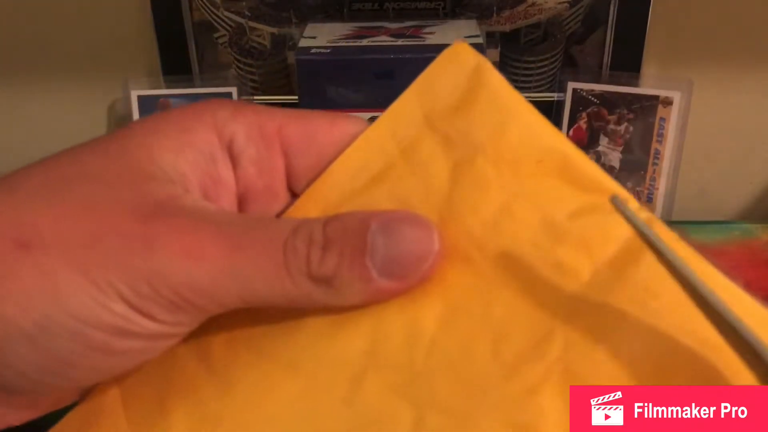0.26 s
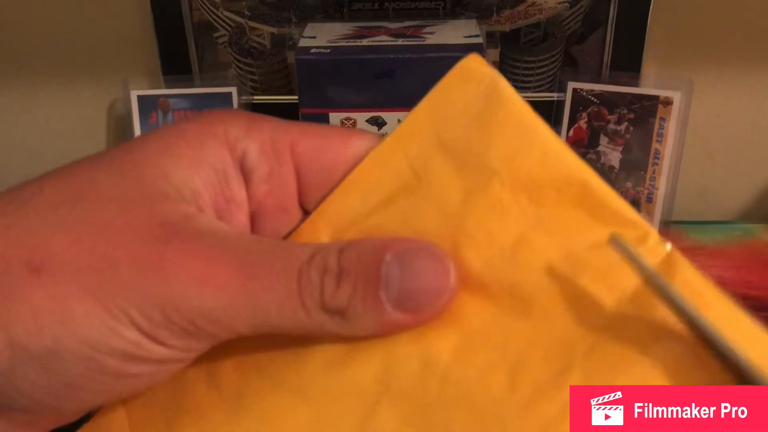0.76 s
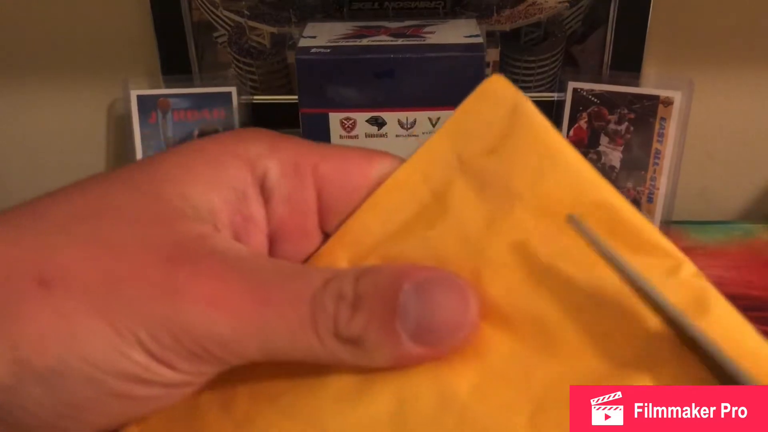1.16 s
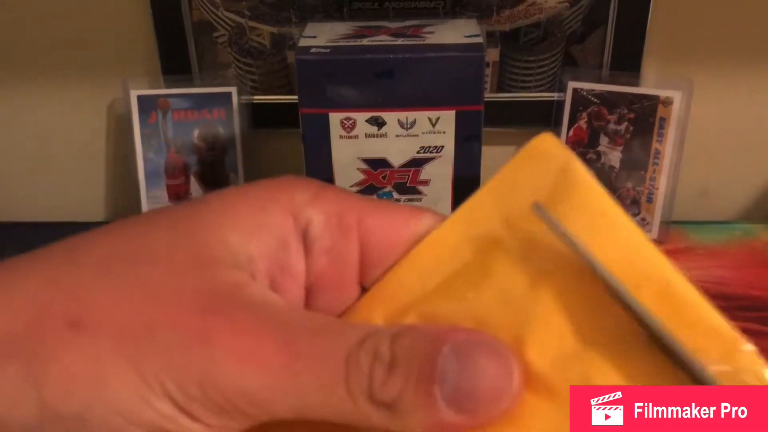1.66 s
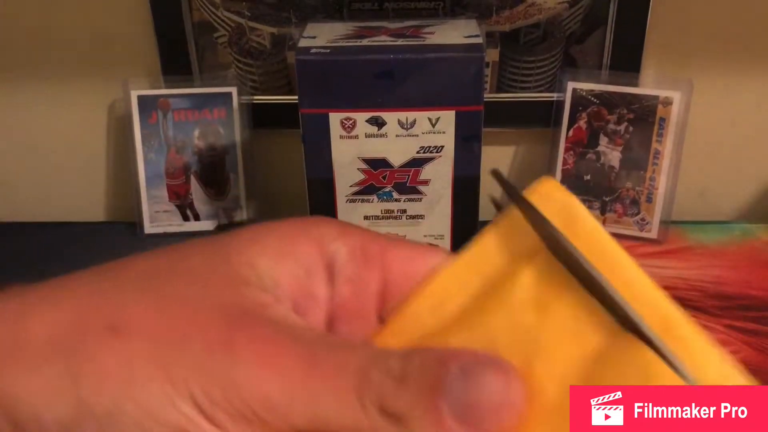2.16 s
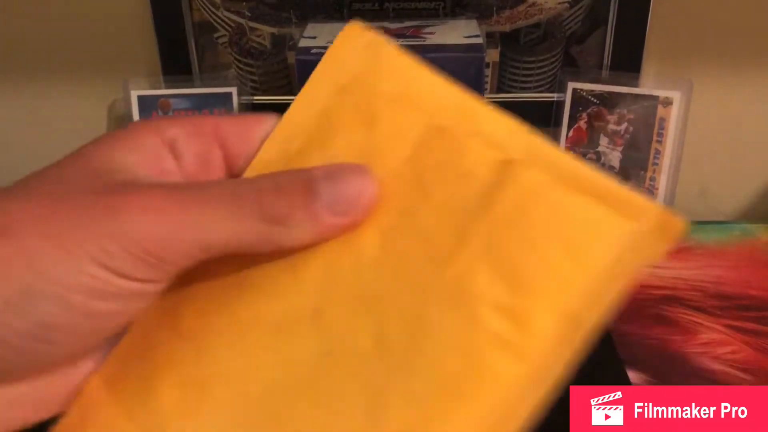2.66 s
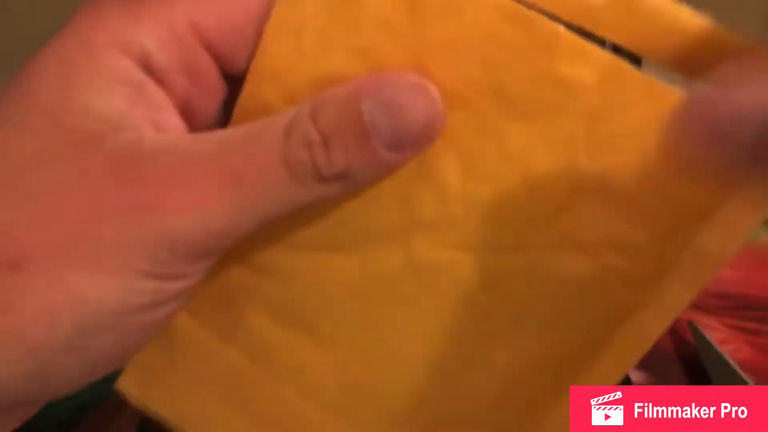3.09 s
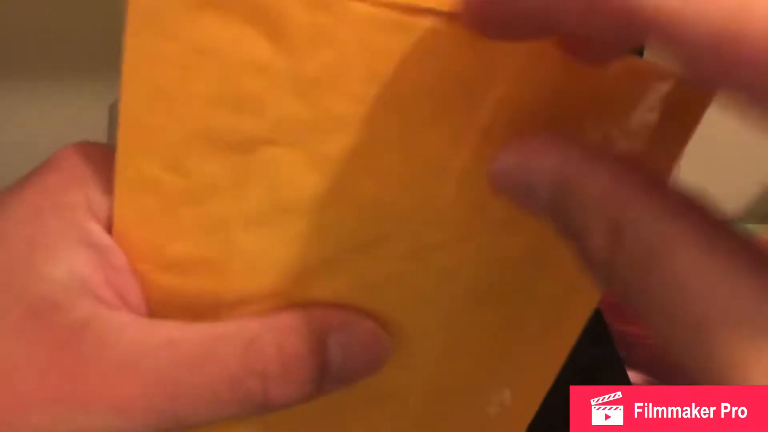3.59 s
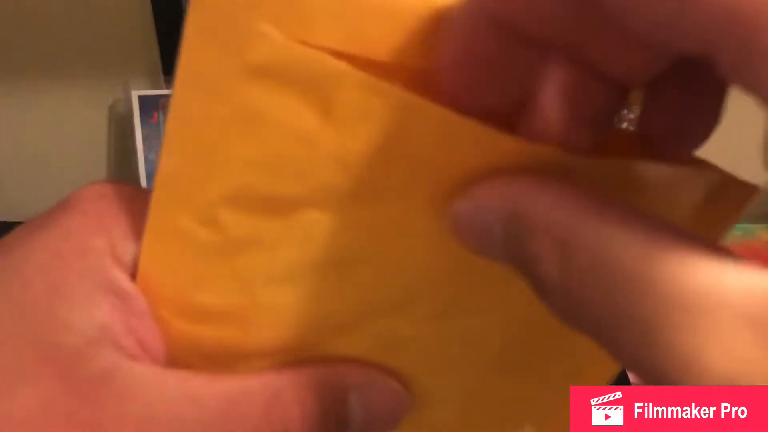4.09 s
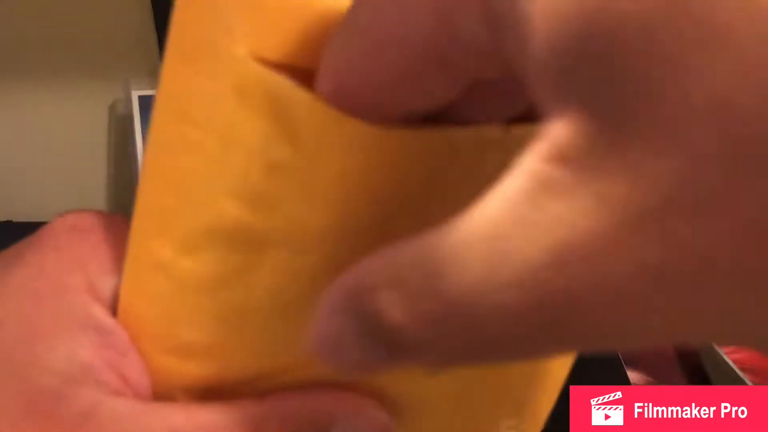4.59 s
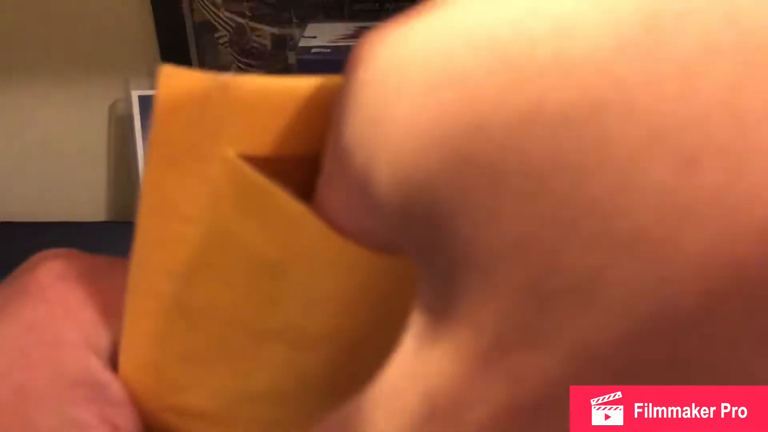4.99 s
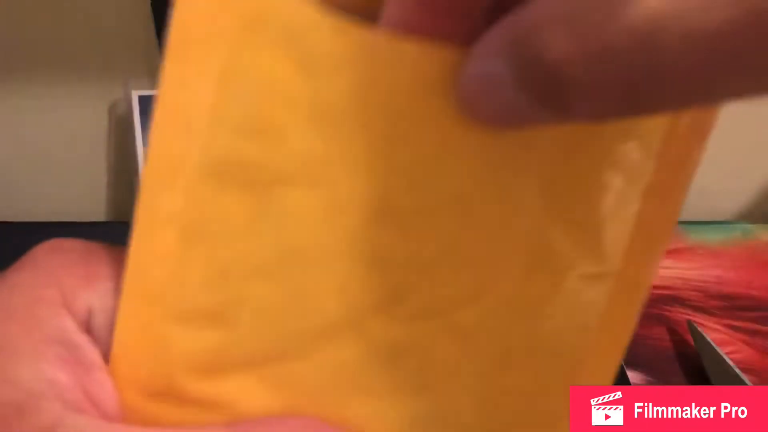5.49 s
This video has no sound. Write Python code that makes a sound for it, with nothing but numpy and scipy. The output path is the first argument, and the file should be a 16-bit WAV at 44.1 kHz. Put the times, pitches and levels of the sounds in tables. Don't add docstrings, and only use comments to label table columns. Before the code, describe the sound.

A padded paper mailer is opened very close to a small microphone in a small, slightly reverberant room with faint low mains hum and air noise. From 0 s scissors push quietly through the paper in short rasping strokes; by 0.5 s the scratching grows, with a sharp crack near 0.9 s. Cutting gets denser and brighter, with hard snaps at 1.3 and 1.8 s, the latter the loudest, and a low crunch just after. Strokes fade around 2.4 s, leaving tiny paper ticks. At about 2.75-3.0 s the scissors drop on a wooden table, a dull low thump with quick bounces and light handle knocks. From 3.1 s the envelope is turned and handled in short crinkles. Prying snaps cluster at 4.0-4.4 s, then a hand slides inside with continuous dry rustling, soft padded pats and strong crunches near 4.8 s. Rustling thins after 5.3 s, with a last snap near 5.7 s.

```python
import sys
import numpy as np
from scipy import signal
from scipy.fft import rfft, irfft, next_fast_len
from scipy.io import wavfile
from scipy.ndimage import uniform_filter1d, map_coordinates

SR = 44100
rng = np.random.default_rng(int(sys.argv[2]) if len(sys.argv) > 2 else 0)


def makeup_ratio(level_db):
    decades = np.asarray(level_db, float) / 20
    return 10 ** decades


def inscribe(sig):
    pcm = np.round(np.clip(np.atleast_2d(sig).T, -1, 1) * 32767)
    wavfile.write(sys.argv[1], SR, pcm.astype(np.int16))


N = 253530


def unit(x):
    return x / np.sqrt(np.mean(x ** 2) + 1e-20)


def along(points, hz):
    f, v = np.transpose(points)
    return np.interp(np.log(hz + 1), np.log(f + 1), v)


def wobble(rate):
    knots = rng.standard_normal(int(N * rate / SR) + 4)
    return map_coordinates(knots, [np.arange(N) * rate / SR])


def filtered(x, response):
    m = next_fast_len(N + SR // 2)
    return irfft(rfft(x, m) * response(np.fft.rfftfreq(m, 1 / SR)), m)[..., :N]


def ring(modes, t, spread_db):
    total = np.zeros(len(t))
    for hz, db, t60 in modes:
        strike_db = db + spread_db * rng.standard_normal()
        total += makeup_ratio(strike_db - 60 * t / t60) * np.sin(2 * np.pi * hz * t)
    return total


def place(out, s, sound):
    out[round(s * SR):][:len(sound)] += sound


def strokes(rows):
    t, level, dull = np.arange(0, N, 16) / SR, -120., 0.
    stick_db, attack_db_per_s, release_db_per_s = 10, 2500, 361
    for s, length, in_db, out_db, dull_db in rows:
        end = s + length
        swell = np.interp(t, [s, end, end + 0.0055], [in_db, out_db, out_db - stick_db])
        swell = swell - attack_db_per_s * (s - t).clip(0)
        swell = swell - release_db_per_s * (t - end).clip(0)
        dull = np.where(swell > level, dull_db, dull)
        level = np.maximum(level, swell)
    return [np.interp(np.arange(N) / SR, t, c) for c in (level, dull)]


def fibres(share, spread_db):
    hit = rng.random(N) < share
    size_db = spread_db * rng.exponential(size=N).clip(0, 3)
    return unit(hit * rng.standard_normal(N) * makeup_ratio(size_db))


def crinkles():
    pops_per_s, middle_hz, cycles = 260, 2225, 12.2
    draw, t = rng.random((int(pops_per_s * N / SR), 3)), np.arange(200) / SR
    hz = middle_hz * np.exp(2.22 * (draw[:, 1:2] - .5))
    size_db = -4.5 * np.log(1 - draw[:, 2:]).clip(-3.5, 0)
    pops = makeup_ratio(size_db - 60 * t * hz / cycles / 2) * np.sin(2 * np.pi * hz * t)
    at = (draw[:, :1] * N).astype(int) + np.arange(len(t))
    return unit(np.bincount(at.ravel(), pops.ravel(), N + len(t))[:N])


def bent(x, fold_hz, lift_db, patchy_db, held_db):
    hz, t, z = signal.stft(x, SR, nperseg=256)
    hz = hz[:, None]
    centre = fold_hz[np.minimum((t * SR).astype(int), N - 1)]
    lift = lift_db * np.exp(-(np.log((hz + 1) / centre) / 0.37) ** 2)
    field = uniform_filter1d(rng.standard_normal(z.shape), size=4, axis=0)
    field = uniform_filter1d(field, size=5, axis=1)
    held = uniform_filter1d(rng.standard_normal(z.shape), size=2, axis=0)
    held = uniform_filter1d(held, size=18, axis=1)
    patches = patchy_db * unit(field) + held_db * unit(held)
    patches = patches / (1 + (hz / 6500) ** 2)
    return signal.istft(z * makeup_ratio(lift + patches), SR, nperseg=256)[1][:N]


# (start [s], length [s], level as it sets in [dB], level as it ends [dB], dullness [dB])
CUTS = [(0.0, 0.073, -69, -66, 0), (.1, .07, -58, -67, 0), (.18, 0.06, -59, -56.5, 0),
        (.262, 0.05, -52, -48, 2), (.32, .016, -53, -50, -2), (.337, 0.026, -60, -52, 0),
        (.365, .04, -62, -63, 4), (.41, 0.055, -58, -54, 2), (.465, 0.022, -43, -42, 0),
        (.487, .035, -41, -51, 0), (.525, .025, -59, -59, 3), (.55, 0.028, -49, -43, 0),
        (.582, .014, -38, -41, 1), (.598, .014, -40, -40, 2), (.613, 0.03, -47, -53, 0),
        (.645, .065, -59, -63, 3), (.717, 0.081, -50, -50, 0), (.82, 0.03, -48, -38, 0),
        (.85, .028, -38, -36, 0), (.882, 0.09, -36, -58, 2), (.975, 0.074, -42.5, -44, 0),
        (1.05, .04, -53, -49, 0), (1.092, 0.02, -35, -36, -3), (1.117, .033, -36, -33, 3),
        (1.175, .05, -54, -58, 4), (1.228, 0.066, -44.5, -38.5, 6), (1.298, .03, -36, -48, 6),
        (1.335, 0.028, -37, -42, 1), (1.368, .016, -39, -38, 2), (1.393, .012, -39, -44, -2),
        (1.481, 0.07, -40, -39.5, 0), (1.585, 0.02, -31, -37, 0), (1.606, .037, -36, -39, 0),
        (1.725, 0.053, -42.5, -37, 0), (1.78, .006, -29, -33, -4), (1.788, .025, -39, -41, 5),
             (1.815, .02, -48, -54, 3), (1.838, .024, -41, -36, 0), (1.871, .013, -30, -34, -3),
             (1.886, .08, -44, -62, 0), (1.973, 0.06, -50, -39, 4), (2.035, .025, -39, -41, 5),
             (2.07, 0.028, -40, -35, 0), (2.098, 0.024, -32, -31, 3), (2.127, .017, -39, -38, 0),
             (2.15, 0.06, -50, -53, 3), (2.22, .03, -44, -48, 2), (2.26, 0.034, -48, -39, 0),
             (2.295, .026, -39, -44, 3), (2.344, .014, -40, -44, 0), (2.36, 0.026, -34, -32, -2),
             (2.387, 0.25, -52, -71.5, 3), (2.602, .09, -73, -63.5, 0)]
GRIPS = [(2.79, 0.22, -59, -78, 0), (3.06, 0.072, -47, -39, 0), (3.134, .045, -38.5, -55.5, 0),
         (3.181, .083, -55.5, -54, 0), (3.262, .022, -42, -36, 0), (3.285, 0.04, -38, -54, 0),
         (3.334, .06, -44.5, -54.5, 0), (3.382, .03, -46, -44, 2), (3.412, 0.06, -48, -62, 0),
         (3.502, 0.022, -57, -71, 0), (3.538, .025, -48, -54, 0), (3.57, 0.04, -51, -52, 0),
         (3.64, 0.039, -76, -62, 0), (3.70, 0.041, -63, -50.5, 0), (3.745, .014, -48, -40, 0),
         (3.76, .06, -41, -60, -3), (3.833, 0.083, -50.5, -60, 0), (3.925, 0.023, -50, -44, 0),
         (3.948, .013, -36, -39, 2), (3.962, .015, -37, -37, -6), (3.978, 0.036, -45, -45, 0),
         (4.015, .02, -40, -40, 4), (4.036, .11, -44, -44, 0), (4.151, 0.034, -43, -38, -2),
         (4.195, .105, -42, -42, 0), (4.3, 0.045, -48, -44, 0), (4.346, .03, -39, -41, 3),
         (4.38, .035, -39, -39, -3), (4.416, 0.12, -45.5, -43, 0), (4.536, .1, -41, -44, 0),
         (4.636, 0.148, -45, -46.5, 0), (4.795, .124, -46, -44, 0), (4.92, 0.1, -43, -60, 0),
         (5.009, 0.09, -56.5, -50, 0), (5.1, .085, -47, -44, 0), (5.187, .15, -46, -44, 0),
         (5.338, 0.15, -47.5, -51, 0), (5.498, 0.1, -57.5, -59, 0), (5.618, 0.045, -64, -50.5, 0),
         (5.666, .09, -47, -47.5, 0)]
# (time [s], ring [Hz], slackness as extra body [dB])
BEND = [(0.0, 3630, -7), (.3, 2900, 0), (.5, 2470, 2), (.75, 3400, 4), (1.1, 4800, -5.5), (1.3, 3250, -1),
        (1.74, 4830, 0), (2.03, 2370, 0.5), (2.35, 4500, -12), (2.9, 2500, -8), (3.1, 3380, 6),
        (3.6, 3940, -0.5), (4.12, 4060, -15), (4.33, 2000, -10), (4.45, 5270, 3), (5.13, 2830, 5),
        (5.35, 3000, 6), (5.74, 2930, 6)]
# (frequency [Hz], density [dB per Hz])
CRACKLE = [(500, -19), (1600, -10), (2200, 0.5), (4000, 0), (6500, 0.5), (9000, -4), (13000, -11.5)]
BODY = [(120, -17), (300, -2), (500, 0), (780, -2.5), (1500, -4), (2500, -15), (5000, -76)]
FIZZ = [(4000, -40), (7000, -16), (10000, -2), (15800, -6.5)]


def rubbing():
    cut_db, cut_dull = strokes(CUTS)
    grip_db, grip_dull = strokes(GRIPS)
    bend_s, bend_hz, bend_db = np.transpose(BEND)
    fold_hz = np.interp(np.arange(N) / SR, bend_s, bend_hz)
    slack_db = np.interp(np.arange(N) / SR, bend_s, bend_db)
    level_db, cutting = np.maximum(cut_db, grip_db), cut_db > grip_db
    dull_db = np.where(cutting, cut_dull, grip_dull)
    body_db = dull_db + np.where(cutting, -3.5, -9.5) + slack_db
    body_db = body_db - 0.1461 * (level_db + 47.5).clip(-30, 30)
    fizz_db = np.where(cutting, -10.5, -6) - 0.7 * dull_db + 1.2 * wobble(17)
    clump_db = 1.4 * wobble(60) + 1.3 * wobble(250)
    clicks = fibres(.06, 0.87)

    def layer(colour, smooth):
        drive = makeup_ratio(clump_db) * (clicks + smooth * rng.standard_normal(N))
        return unit(filtered(drive, lambda hz: makeup_ratio(along(colour, hz))))

    sheet = layer(CRACKLE, 1.5) + makeup_ratio(body_db) * layer(BODY, 2.6) + makeup_ratio(fizz_db) * layer(FIZZ, 1.9)
    sheet = sheet + makeup_ratio(-13) * crinkles()
    sheet = bent(sheet, fold_hz, lift_db=3.5, patchy_db=2.2, held_db=2.4)
    return makeup_ratio(level_db - 1.5) * sheet


# (frequency [Hz], level [dB rms])
HUM = [(60, -84), (120, -48.5), (180, -64)]
# (frequency [Hz], density [dB per Hz])
AIR = [(25, -31), (82, 7), (100, -9), (135, 3), (321, -8), (900, -25.5), (3600, -29.5), (16000, -48)]


def background():
    t, hum = np.arange(N) / SR, np.zeros(N)
    for hz, db in HUM:
        phase = 2 * np.pi * hz * t + 0.5 * wobble(3.3)
        hum += np.sqrt(2) * makeup_ratio(db + 1.5 * wobble(3.97)) * np.sin(phase)
    air = unit(filtered(rng.standard_normal(N), lambda hz: makeup_ratio(along(AIR, hz))))
    return hum + makeup_ratio(-50.5 + 0.81 * wobble(3.8)) * air


# (frequency [Hz], t60 [s])
ROOM = [(200, 0.72), (2000, 0.28), (10000, 0.22)]


def room(x):
    hz, t, z = signal.stft(rng.standard_normal(SR // 2), SR, nperseg=256)
    decay = makeup_ratio(-60 * t / along(ROOM, hz)[:, None])
    tail = signal.istft(z * decay, SR, nperseg=256)[1]
    delayed = np.pad(x, (130, 0))
    return signal.fftconvolve(delayed, tail / np.linalg.norm(tail))[:N]


def snap(db, hz, t60, edge_db, step, rise_s, flex):
    t = np.arange(SR // 16) / SR
    burst = rng.standard_normal(len(t)) * makeup_ratio(-60 * t / t60) * (1 - np.exp(-(t / rise_s) ** 2))
    burst[0] = step
    fold = signal.lfilter(*signal.iirpeak(hz, 2.2, fs=SR), burst)
    broad_band = signal.butter(2, [420, min(3.6 * hz, 9000)], "band", fs=SR)
    main = unit(fold) + makeup_ratio(0.5) * unit(signal.lfilter(*broad_band, burst))
    edge = signal.lfilter(*signal.butter(3, [7000, 16600], "band", fs=SR), burst)
    fall_s, flex_t60 = .0013, .014
    wave = np.sin(2 * np.pi * 1.5 * hz * fall_s * np.log(1 + t / fall_s)) * makeup_ratio(-60 * t / flex_t60)
    sound = flex * wave + main / abs(main).max() + makeup_ratio(edge_db) * edge / abs(edge).max()
    return makeup_ratio(db - 3.0) * sound / abs(sound).max()


# (time [s], peak
# [dB], ring [Hz], burst t60 [s])
SNAPS = [(0.1372, -33, 7100, 0.03), (0.159, -30.5, 2000, 0.02), (0.2545, -33.5, 3270, 0.01),
         (0.3552, -33.5, 3250, 0.034), (1.093, -20, 4900, 0.019), (1.106, -18.5, 4500, .013),
         (1.1613, -18.5, 4200, 0.03), (1.2531, -21.5, 696, 0.039), (1.336, -25, 5160, 0.061),
         (1.372, -25, 900, 0.025), (1.3809, -26, 970, .0084), (1.514, -24, 4450, .008),
         (1.5873, -18.5, 5140, .033), (1.604, -17, 5640, 0.026), (1.637, -21.5, 990, 0.025),
         (1.755, -22, 3820, 0.019), (1.766, -20, 790, 0.018), (1.9076, -19, 4600, .016),
         (2.209, -23.5, 7640, 0.014), (2.2935, -23, 4450, .013), (2.3184, -23, 960, 0.013),
         (2.373, -20, 4480, 0.042), (2.4227, -22, 3380, 0.019), (2.459, -31, 5150, 0.011),
         (.063, -37.5, 1390, 0.013), (.085, -40, 4450, .01), (.19, -33, 5500, .008),
             (0.7063, -30, 6500, 0.0066), (1.1965, -36, 5000, .005), (2.4062, -42, 7940, .006),
             (3.0935, -17.5, 3200, 0.016), (3.1046, -31, 3030, .0064), (3.227, -33, 650, 0.02),
             (3.285, -21, 6900, 0.031), (3.3377, -23, 4430, .0086), (3.5116, -34.5, 860, 0.0071),
             (3.5438, -28.5, 3100, 0.025), (3.7113, -30, 3030, 0.0051), (3.7591, -17, 3000, 0.012),
             (3.865, -29, 1080, 0.032), (3.8776, -23, 7400, 0.0026), (3.8938, -30.5, 5190, 0.021),
             (3.9515, -24.5, 1160, .028), (4.02, -23, 1200, 0.053), (4.0496, -15.5, 4760, 0.017),
             (4.079, -25, 6540, 0.0056), (4.1126, -23, 4000, 0.018), (4.237, -17.5, 3120, .01),
             (4.2826, -19, 1450, 0.015),
         (4.3523, -22.5, 1640, 0.077), (4.3674, -14, 8900, 0.013), (4.3894, -20, 6060, 0.066),
               (4.398, -11, 5500, 0.0097), (4.4444, -20, 6140, 0.0094), (4.5438, -19, 8240, 0.017),
               (4.5587, -30, 964, 0.0091), (4.9125, -18, 5230, 0.012), (5.113, -26, 1420, 0.032),
               (5.1467, -18, 9000, 0.0033), (5.16, -25.5, 4120, 0.024), (5.1756, -26, 1410, 0.03),
               (5.265, -27, 3500, 0.025), (5.377, -35, 2900, .012), (5.573, -33, 5200, .005),
               (5.3196, -26, 9000, .004), (5.4966, -24, 8900, .004), (5.516, -30, 7900, .0041),
               (5.527, -38, 9000, .004), (5.5824, -33, 5100, 0.0052), (5.6661, -14, 2450, 0.025),
               (5.718, -27, 2560, 0.036),
         (.5505, -31, 2500, .01), (.518, -37, 7500, .006), (.209, -38, 4000, .008),
               (.181, -39, 4100, .006), (2.8118, -24, 9000, .014), (2.828, -38, 9000, .01),
               (2.966, -42, 9000, .006), (3.014, -42, 9500, .006), (2.655, -44, 9500, .005),
               (3.505, -38, 7000, .005), (3.525, -38, 6000, .005), (3.692, -38, 6000, .005),
               (3.843, -33, 1500, .01), (4.068, -29, 7000, .005), (1.044, -29, 800, .015),
               (1.133, -26, 420, .02), (1.146, -24, 750, .02), (1.213, -36, 9000, .005),
               (1.797, -24, 480, .02), (1.811, -27, 1000, .01), (2.1, -21, 550, .02),
               (2.225, -30, 1300, .015), (2.334, -30, 800, .01), (4.09, -24, 3800, .006),
               (4.127, -25, 9500, .005), (4.1445, -25, 9000, .005), (4.604, -25, 1400, .01),
               (4.629, -25, 3000, .008), (5.125, -31, 520, .02), (5.236, -32, 900, .01),
               (5.278, -31, 1000, .012), (5.293, -28, 9000, .004)]
# (time [s], peak [dB], ring [Hz], burst t60 [s], relative bright edge [dB])
CRACKS = [
    (0.8816, -3.5, 1700, .014, -8),
    (.9808, -16, 2850, .006, -8),
    (1.2958, -1, 2900, .014, -24),
    (1.779, 1.5, 5900, .007, -8),
    (3.123, -15, 3400, .015, -14),
    (4.2192, -12, 4600, .01, -16),
    (4.294, -11, 2100, .01, -20),
    (4.5563, -6, 6500, .014, -4),
]
CRUNCHES = [
    (1.8672, -5, 1150, .016, -16),
    (4.1858, -7.5, 3280, .024, -14),
    (4.272, -14.5, 1450, .025, -25),
    (4.7866, -14, 2400, .018, -14),
    (4.8036, -8, 2970, 0.018, -14),
    (4.8163, -3.5, 2080, 0.02, -10),
    (5.0993, -21, 1550, .03, -25),
    (5.3623, -21, 1270, .02, -25),
    (5.4875, -27, 740, .02, -25),
    (2.116, -16, 1450, .02, -25),
]


def creases():
    out = np.zeros(N + SR)
    sudden_s, crunch_rise_s = 1e-5, .0012
    for s, db, hz, t60 in SNAPS:
        edge_db = -21 + 9 * np.log2(hz / 3000)
        place(out, s, snap(db, hz, t60, edge_db, 3.0, sudden_s, 0))
    for s, *shape in CRACKS:
        place(out, s, snap(*shape, 4.0, sudden_s, makeup_ratio(-1.5)))
    for s, *shape in CRUNCHES:
        place(out, s, snap(*shape, 0, crunch_rise_s, 0))
    return out[:N]


# (time [s], peak [dB], frequency [Hz])
PATS = [(3.095, -34.5, 284), (3.227, -44, 274), (3.286, -31.5, 204), (3.336, -36, 217), (3.401, -39, 197),
        (3.755, -35, 289), (3.949, -38.5, 376), (4.052, -31.5, 227), (4.187, -32.5, 279),
        (4.274, -33.5, 400), (4.35, -34, 404), (4.369, -34, 380), (4.297, -38, 330), (4.1, -39, 260),
        (4.397, -34, 151), (4.783, -38.5, 358), (4.912, -38.5, 423), (5.102, -37, 443), (1.6, -38, 270),
        (.884, -36, 290)]


def pocket_pats():
    out, t = np.zeros(N + SR), np.arange(SR // 8) / SR
    for s, db, hz in PATS:
        push = ring([(hz, 0, .05), (1.62 * hz, -6, .035)], t, 0.53) * (1 - np.exp(-t / 0.00067))
        place(out, s, makeup_ratio(db + 4.5) * push)
    return out[:N]


# (time [s], peak [dB], ring [Hz])
TICKS = [
    (1.4276, -35, 1310),
    (2.525, -38, 2870),
    (2.5673, -40.5, 3340),
    (2.576, -46, 2600),
    (2.592, -44, 4100),
    (2.615, -47, 4700),
    (2.744, -49, 5500),
    (2.781, -42, 2700),
    (2.638, -43.5, 3370),
    (2.678, -40, 3240),
]


def settling():
    out, t = np.zeros(N + SR), np.arange(SR // 50) / SR
    for s, db, hz in TICKS:
        modes = [(hz, db, .007), (1.58 * hz, db - 9, .005), (0.75 * hz, db - 23, .006)]
        place(out, s, ring(modes, t, 1.0))
    return out[:N]


# (time [s], peak [dB], relative handle knock [dB], relative blade tick [dB])
BLOWS = [(2.756, -22.5, -14.5, -15), (2.793, -27.5, 4.5, 1.5), (2.804, -11.5, -21, -31),
         (2.8124, -19, 3.5, -1.5), (2.83, -29, -14, -26), (2.852, -19, -8.5, -14), (2.882, -21.5, -17, -24),
         (2.889, -31.5, -2.5, -11), (2.914, -25, -25, -32), (2.94, -27.5, -1.5, -7.5),
         (2.955, -30.5, 2.5, -10), (2.985, -37.5, -3, -13), (3.015, -33.5, -9.5, -15)]
# (frequency [Hz], level [dB], t60 [s])
TABLE = [(134, -4, 0.11), (171, 4, 0.07), (262, -13, 0.06)]
HANDLES = [(330, -5, .04), (390, -4, .035), (439, -6, 0.05), (468, -6, 0.06), (560, -9, .03),
           (728, -3, 0.022), (798, -3, 0.026), (970, -3, 0.03), (1200, -2.5, 0.024), (1440, -7, 0.018),
           (1816, -8, .014)]


def table():
    out, t = np.zeros(N + SR), np.arange(SR // 6) / SR
    steel = signal.butter(3, [750, 4600], "band", fs=SR)
    for s, db, knock_db, tick_db in BLOWS:
        thud = ring(TABLE, t, 0.99) * (1 - np.exp(-t / 0.0055))
        detune = 1 + .035 * rng.standard_normal()
        knock = ring(HANDLES, t * detune, 2.2) * (1 - np.exp(-t / 0.0012))
        tick = signal.lfilter(*steel, rng.standard_normal(len(t))) * makeup_ratio(-60 * t / 0.014)
        blow = thud + makeup_ratio(knock_db - 0.5) * knock + makeup_ratio(tick_db + 5.5) * tick
        place(out, s, makeup_ratio(db + 0.5) * blow)
    return signal.lfilter(*signal.butter(4, 112, "high", fs=SR), out[:N])


def scene():
    top_hz = 15850
    slides, hits = rubbing(), creases() + table() + pocket_pats()
    steady = slides + background() + room(makeup_ratio(-20) * hits + makeup_ratio(-27.5) * slides)
    steady = filtered(steady, lambda hz: hz < top_hz)
    hits = filtered(hits, lambda hz: np.where(hz < top_hz, 1, makeup_ratio(-25)))
    return (steady + hits + settling())[None]


def band_limit(x):
    return signal.sosfilt(signal.butter(12, 17010, fs=SR, output="sos"), x)


def record(dry):
    heard = signal.lfilter(*signal.butter(4, 45, "high", fs=SR), dry)
    return band_limit(heard)


dry = scene()
out = record(dry)
inscribe(out)
```